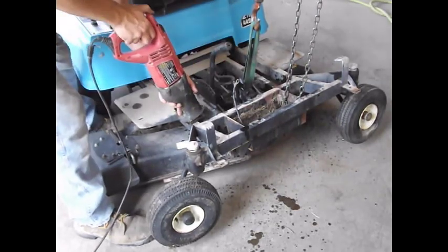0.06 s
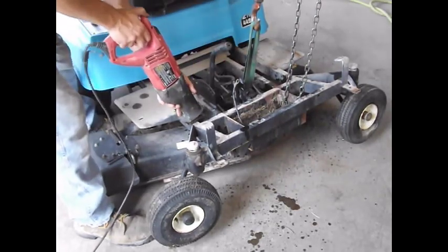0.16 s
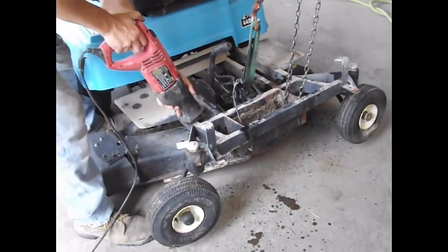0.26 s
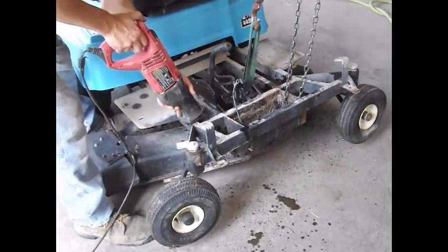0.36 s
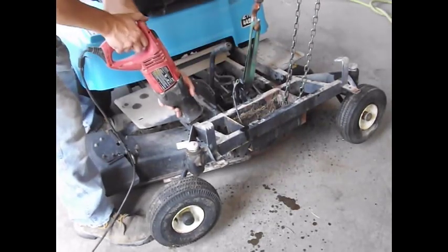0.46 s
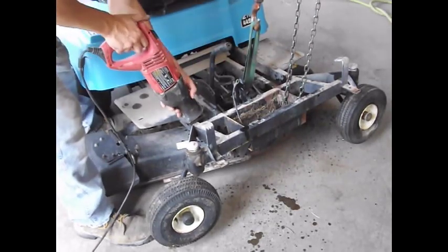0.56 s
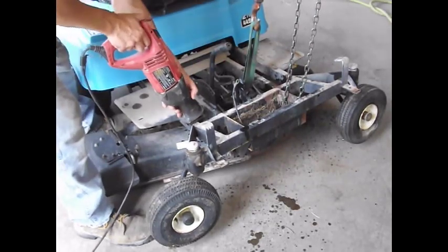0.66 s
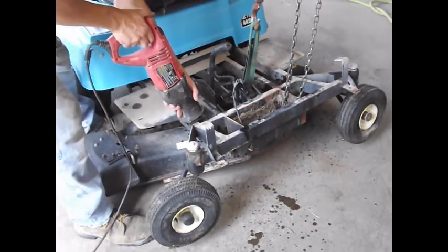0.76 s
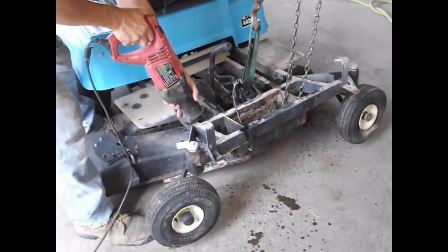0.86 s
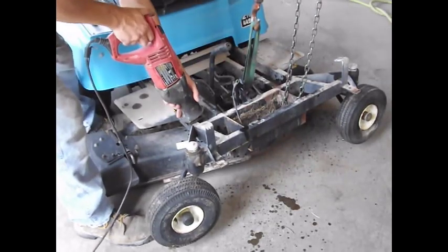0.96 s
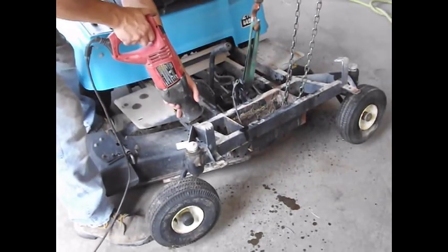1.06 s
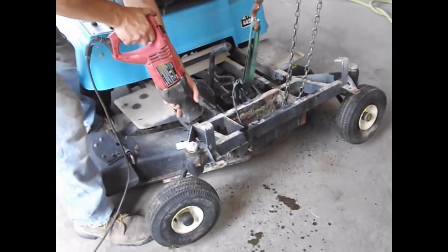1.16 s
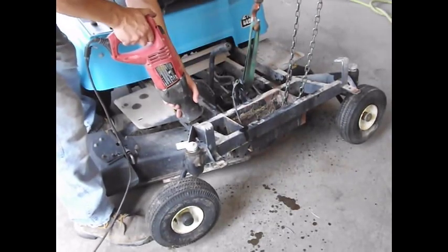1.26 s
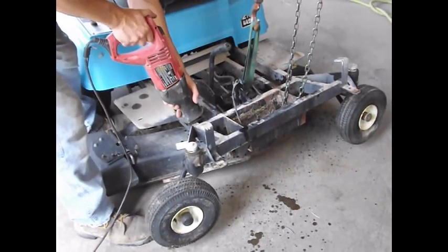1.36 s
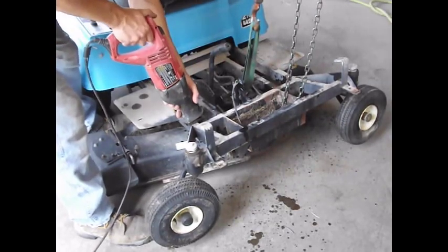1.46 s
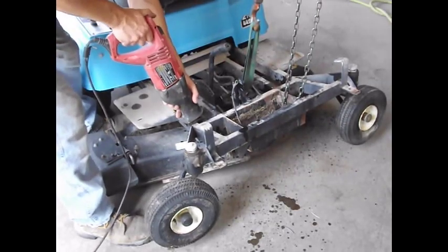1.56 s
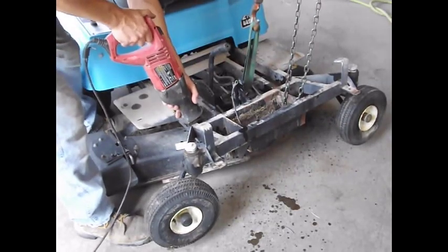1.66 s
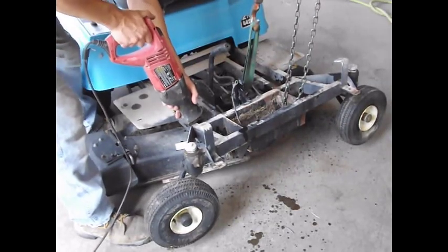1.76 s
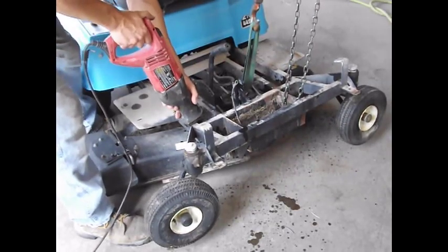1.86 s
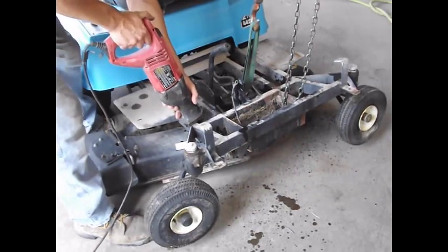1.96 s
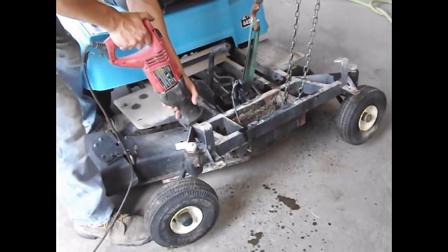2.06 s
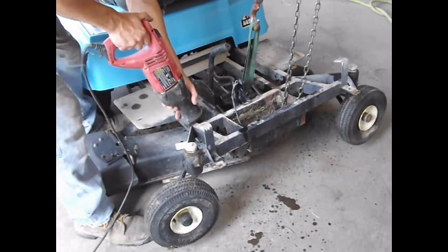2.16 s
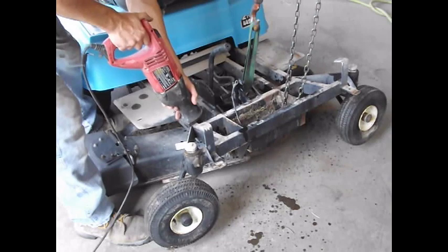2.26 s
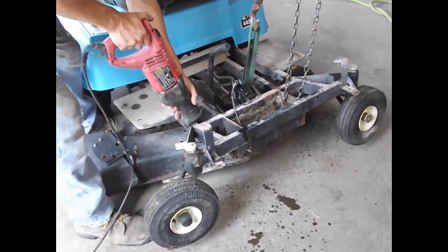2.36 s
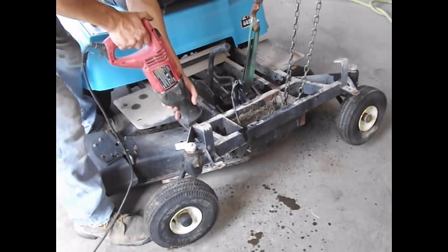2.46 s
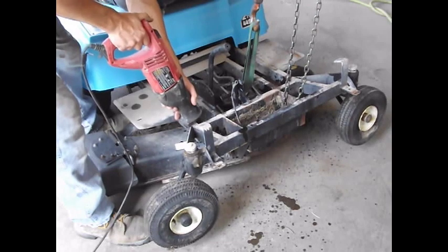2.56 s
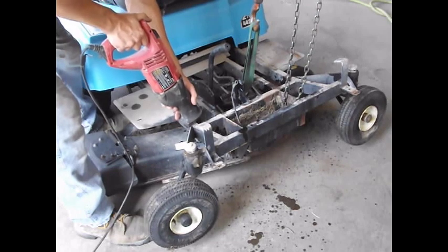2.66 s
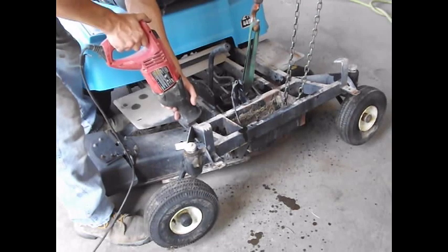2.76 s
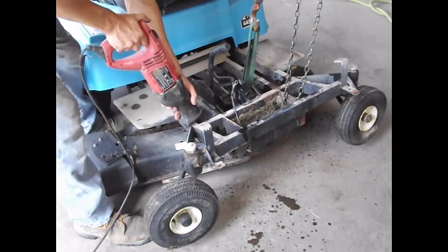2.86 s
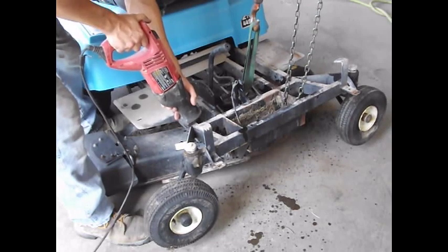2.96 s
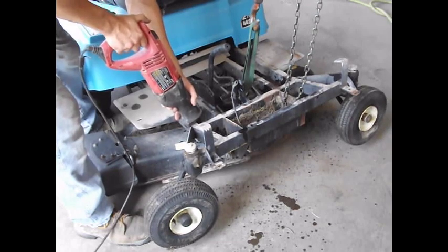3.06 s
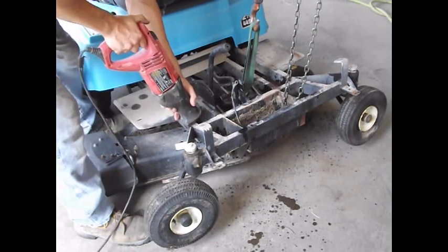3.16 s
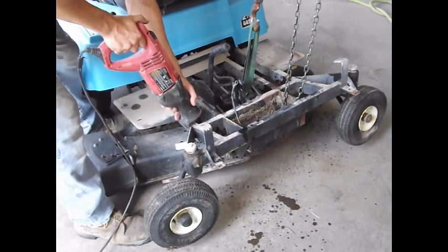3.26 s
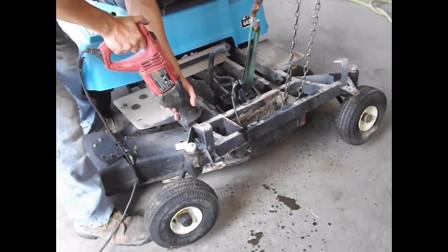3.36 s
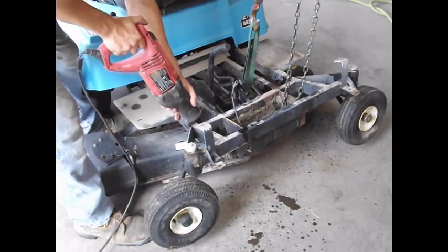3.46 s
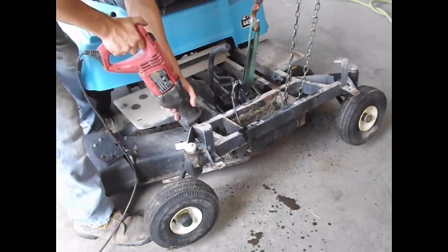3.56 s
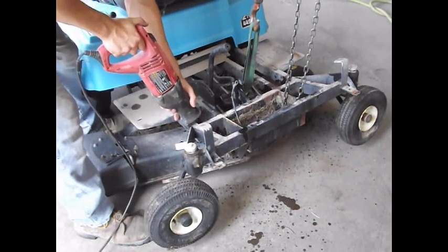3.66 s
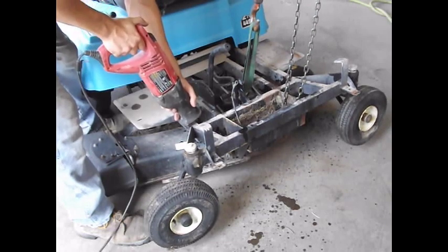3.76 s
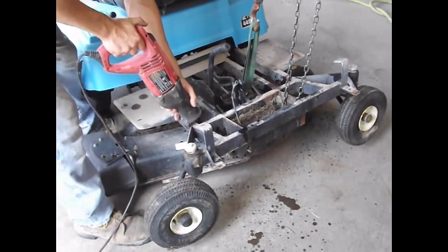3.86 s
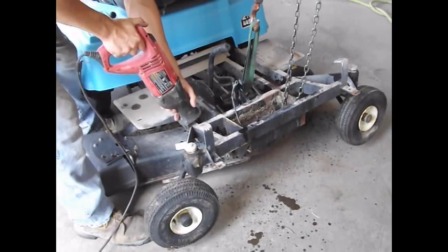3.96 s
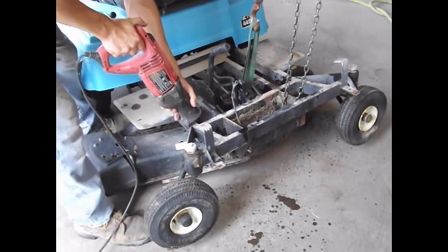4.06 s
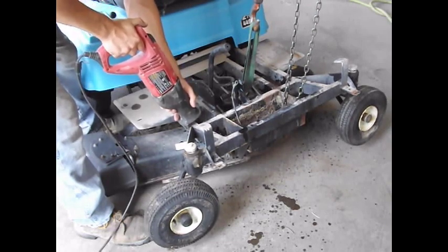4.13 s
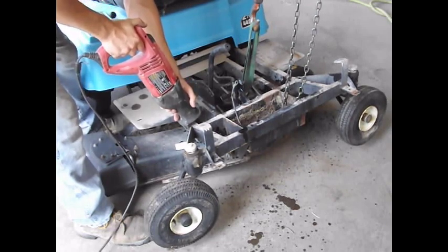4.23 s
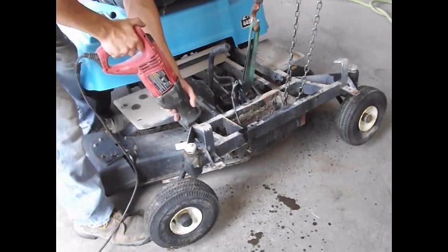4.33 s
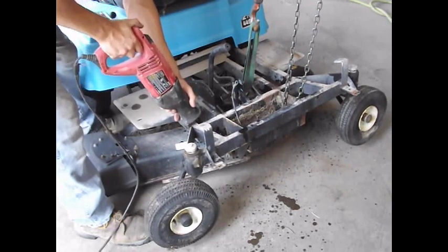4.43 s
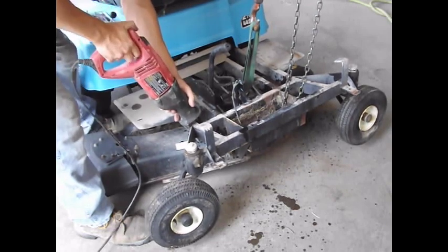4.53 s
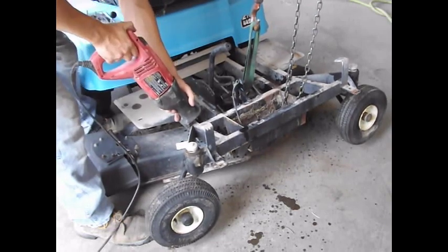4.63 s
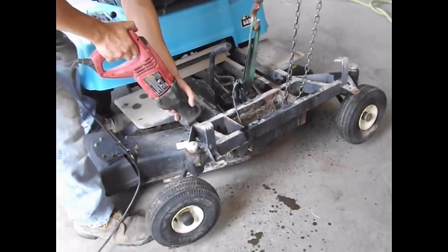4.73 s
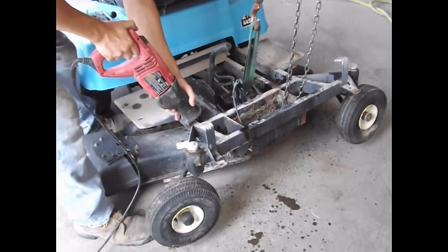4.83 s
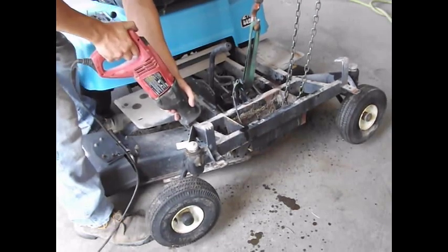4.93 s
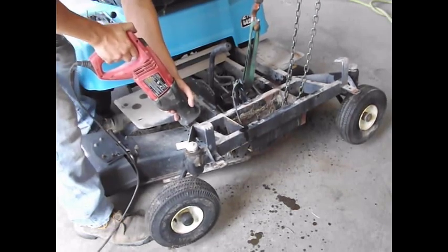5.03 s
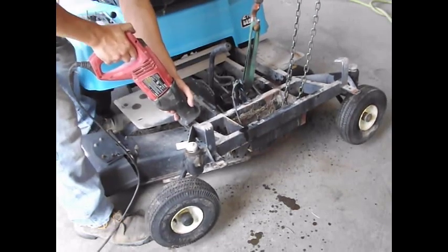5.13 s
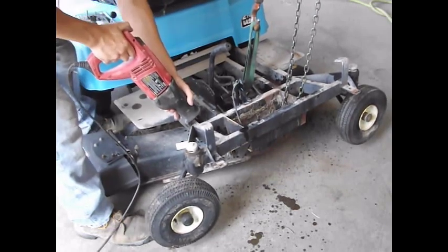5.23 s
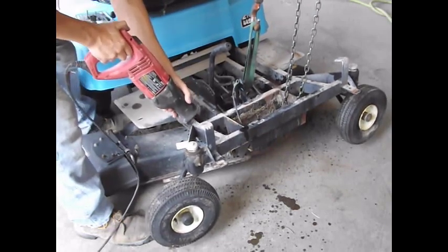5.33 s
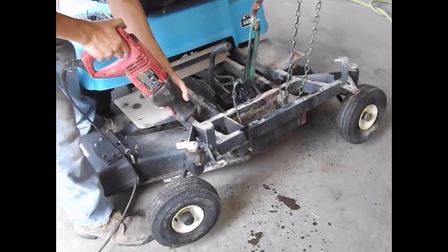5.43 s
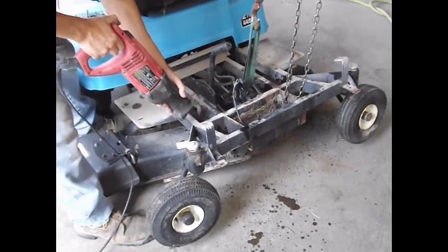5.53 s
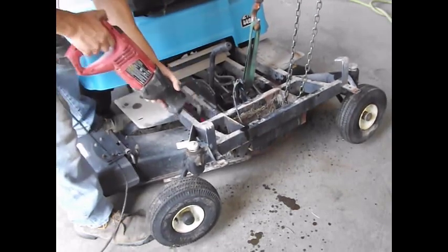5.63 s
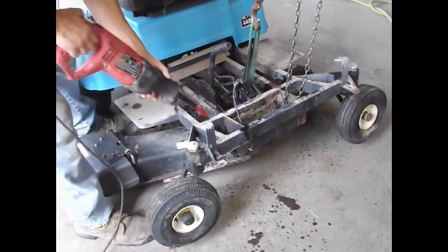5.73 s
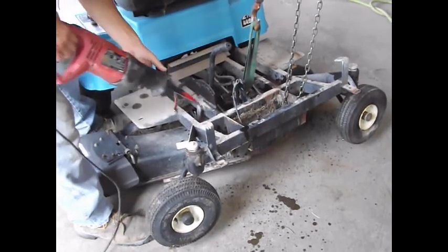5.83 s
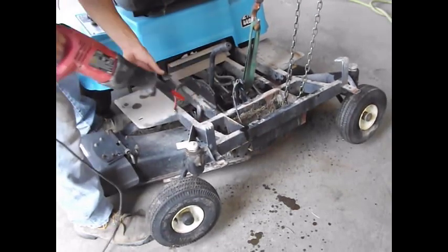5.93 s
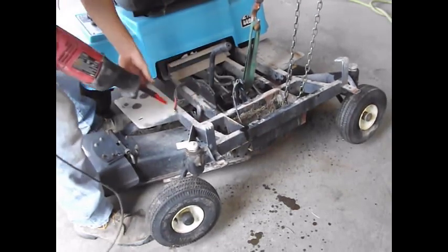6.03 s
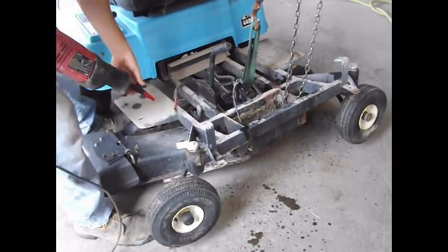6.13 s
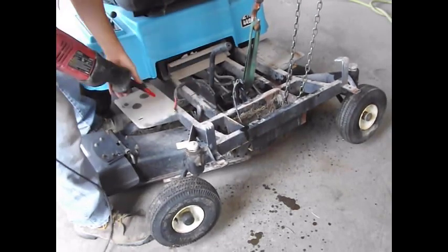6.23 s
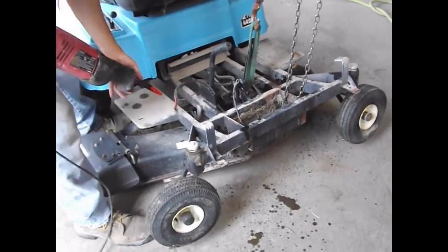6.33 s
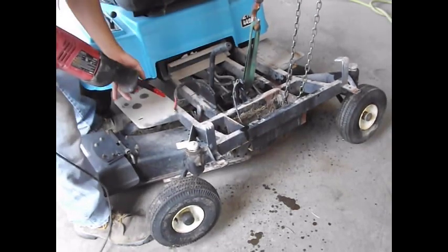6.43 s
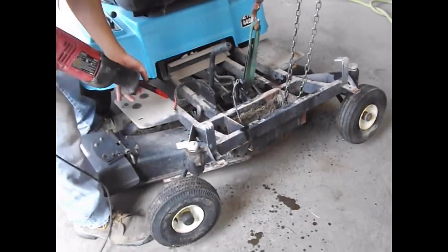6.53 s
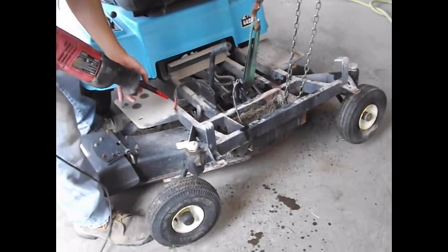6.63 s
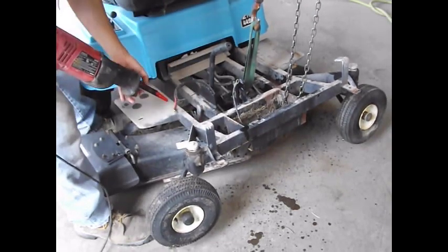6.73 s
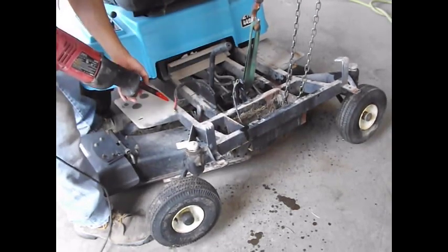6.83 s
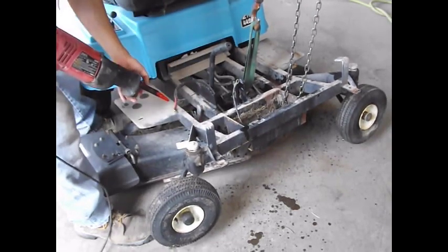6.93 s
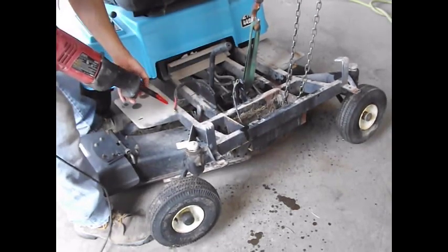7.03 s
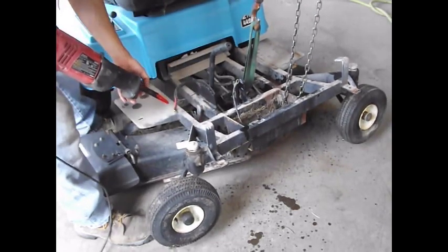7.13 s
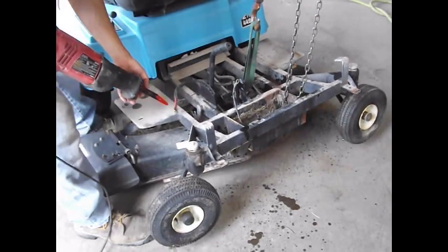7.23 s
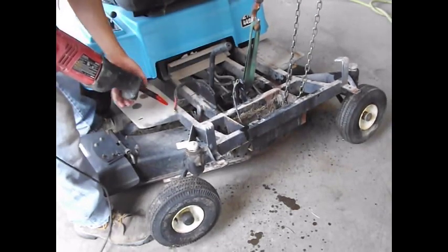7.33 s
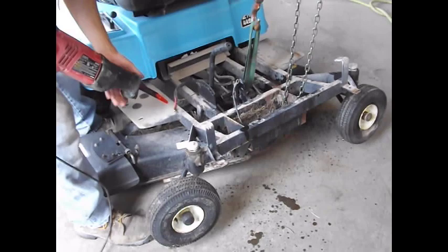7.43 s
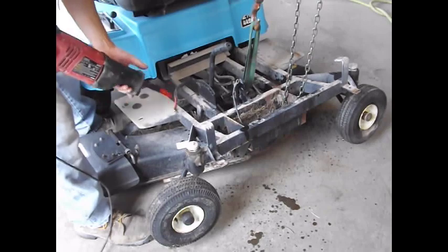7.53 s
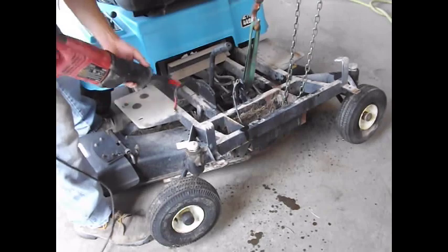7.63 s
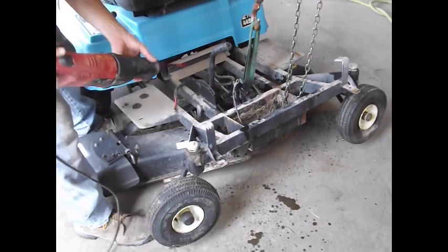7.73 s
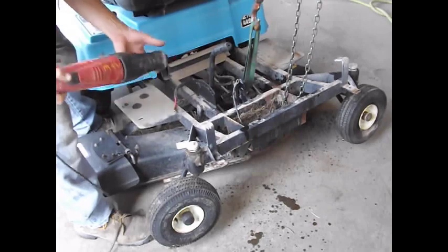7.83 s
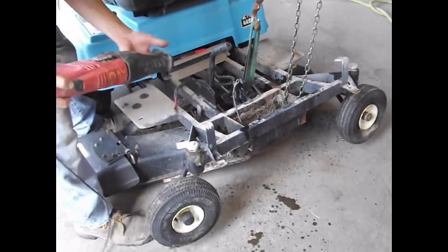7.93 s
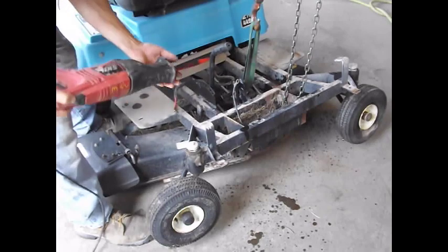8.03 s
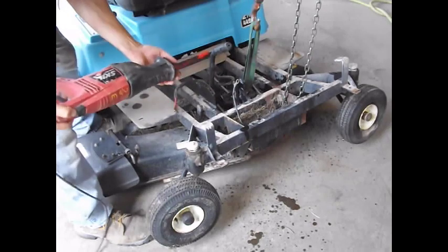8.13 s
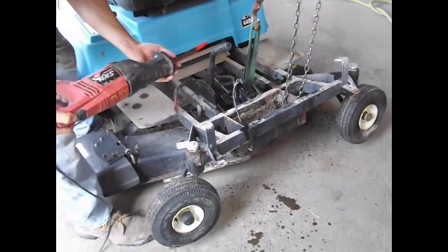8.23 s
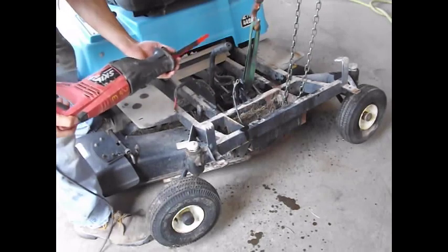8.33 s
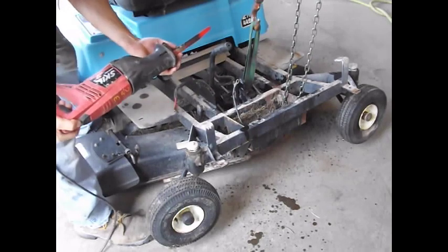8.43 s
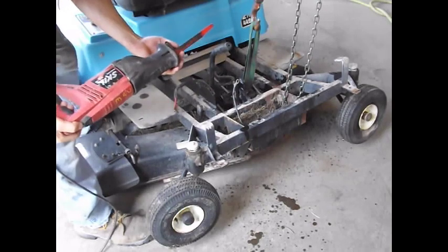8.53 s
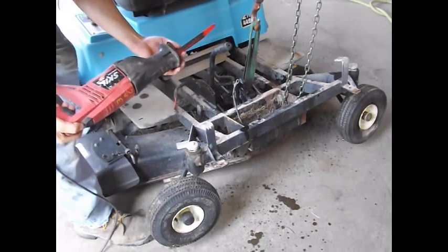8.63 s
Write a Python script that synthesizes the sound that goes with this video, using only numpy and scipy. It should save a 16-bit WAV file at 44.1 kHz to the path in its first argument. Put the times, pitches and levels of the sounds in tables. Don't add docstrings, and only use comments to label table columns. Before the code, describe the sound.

After small knocks and a squeak, a power saw grinds loudly through metal, winds down, and is clattered free in a workshop.

```python
import sys
import numpy as np
from scipy import signal
from scipy.fft import rfft, irfft
from scipy.io import wavfile
from scipy.ndimage import uniform_filter1d

SR = 44100
rng = np.random.default_rng(int(sys.argv[2]) if len(sys.argv) > 2 else 0)


def nominal_scale(level):
    x = np.asarray(level, float) / 20
    return 10 ** x


def dump_mix(stems):
    frames = np.atleast_2d(stems).T
    limited = np.clip(frames, -1, 1)
    pcm = np.round(limited * 32767).astype(np.int16)
    wavfile.write(sys.argv[1], SR, pcm)


N = 383229

# (frequency [Hz], density [dB per Hz])
SHOP_HISS = [(26, -8), (45, -18.5), (76, -13), (279, -12), (358, -16.5), (478, -19), (614, -18.5),
             (989, -22), (1410, -21.5), (2040, -20.5), (3160, -19.5), (4880, -26.5), (6390, -31),
             (8310, -104), (14100, -120)]
# (frequency [Hz], density [dB per Hz])
AIR_RUMBLE = [(1.8, -31.5), (3.0, -5.5), (16, 7), (25, -6.5), (54, -11.5), (83, -20), (120, -23.5),
              (160, -46.5), (260, -120)]
# (time [s], level [dB])
DRAUGHT = [(0, -27), (.85, -30), (1.3, -33), (5.2, -35), (5.8, -29.5), (6.2, -34.5), (7.6, -33.5),
           (8.0, -30.5), (8.69, -30)]
# (time [s], peak [dB], rise [s per 10 dB], fall [s per 10 dB])
DRAGS = [(.3, -42.5, 0.3581, 0.1655), (.6, -46, 0.0617, 0.13), (1.1, -45.5, 0.298, 0.8345),
         (1.283, -30.5, 0.0187, 0.4565), (5.8, -40, 1.1513, 0.3225), (7.1, -46.5, .5, 1.3741),
         (7.6, -44.5, 0.5755, 1), (7.9, -40, 0.4859, 0.0055), (7.99, -27.5, 0.0475, 0.1283),
         (8.11, -40, .02, .25), (8.45, -40.5, 0.0041, 0.2228), (8.69, -45.5, 0.1509, -1.1782)]
# (time [s], pitch [Hz], level [dB])
SQUEAK = [(.5, 2785, -80), (.58, 2976, -44), (.68, 3230, -62), (1.0, 2750, -55), (1.1, 2880, -50),
          (1.17, 3050, -45.5), (1.24, 3150, -49), (1.3, 3250, -46)]
# (time [s], pitch [Hz], level [dB])
TUBE_HUM = [(7.8, 561.9, -69.5), (8.044, 544.2, -50), (8.356, 549.4, -55), (8.69, 541.5, -56)]
# (time [s], peak [dB], thud re peak [dB], part resonance [Hz])
KNOCKS = [(0.1616, -23.5, -5.5, 2800), (0.1721, -21, -34.5, 1261), (0.2157, -24.5, -11, 1214),
          (0.2679, -23, -10.5, 2610), (0.595, -24, -20, 2988), (5.687, -17.5, -32.5, 2851),
          (5.7466, -23, -25, 2738), (5.7954, -24.5, -29.5, 2862), (6.0253, -20.5, -24.5, 3062),
          (6.0479, -17, -27, 2837), (6.13, -23, -15.5, 2930), (6.407, -21, -19, 2348),
          (6.4131, -19, -29, 2920), (6.4226, -16, -31.5, 3017), (6.6142, -16, -34, 2826),
          (6.7725, -22.5, -26.5, 1375), (6.943, -20.5, -49.5, 2792), (7.1214, -22.5, -31, 2903),
          (7.7283, -25.5, -13.5, 2675), (7.8284, -28, -5.5, 2589), (7.8821, -26.5, -2.5, 2076),
          (7.9436, -20, -29.5, 2524), (7.961, -7.5, -27, 2490), (7.9671, -9, -14, 3075),
          (7.9734, -16.5, -5, 2820), (8.03, -21.5, -6, 2690), (8.4149, -12, -30, 3900),
          (8.4317, -23, -37, 1830), (8.4461, -19.5, -32.5, 2960), (8.6704, -24.5, -17, 2890)]
# (frequency [Hz], density [dB per Hz])
CRACK = [(400, -34.5), (800, -8), (1300, 0), (2200, -1.5), (3000, 3), (4300, -8), (5200, -19),
         (7000, -17.5)]
# (time [s], pitch [Hz], peak [dB], decay time T60 [s])
PINGS = [
    (.214, 1297, -40, 0.2232),
    (7.963, 3076, -21.5, 0.1186),
    (8.416, 1879, -25, 0.12),
    (8.434, 1870, -32, 0.17),
    (8.448, 1857, -33, .14),
    (8.448, 2699, -33, 0.138),
]
# (time [s], peak [dB])
THUMPS = [
    (1.334, -9),
    (1.41, -12.5),
    (1.84, -16),
    (3.06, -15.5),
    (4.12, -17.5),
    (4.81, -15.5),
    (5.09, -10.5),
    (5.612, -27),
    (7.972, -20),
    (8.03, -27),
]
# (time [s], peak [dB])
SNAGS = [(1.6116, -8.5), (1.6555, -5), (1.6666, -1), (1.7124, -5), (1.8646, -2.5), (1.9536, -2),
         (2.2117, -1.5), (2.4166, -3.5), (2.6045, -0.5), (2.6248, -2.5), (2.7435, 0), (2.9104, -3),
         (2.9527, -4.5), (3.0864, -0.5), (3.1571, -3), (3.275, -2.5), (3.3686, -2), (3.6217, -4.5),
         (3.709, -2), (3.8382, -0.5), (3.9282, -5), (3.9809, -2), (4.1132, -1.5), (4.1968, -2), (4.4899, 1),
         (4.6377, -4.5), (4.6759, -0.5), (5.0868, -4), (5.1065, -0.5), (5.2109, -9)]
# (time [s], peak [dB], chatter [ms])
JAMS = [(1.333, 2.1, 3.9), (1.348, -1.5, 1.6), (1.362, -5, 2.4), (1.408, 1.1, 8.3), (1.421, 1, .7),
        (1.43, -2, .8), (1.45, 1, 1), (1.469, 1, 1.5), (1.537, 4, 1.5), (1.543, 0, 1.2), (2.013, 3.3, .5),
        (2.665, 2, 1.4), (2.669, 0, 1.2), (2.687, 0, 1.4), (3.2, .9, 1), (3.403, .3, 1.2),
        (3.449, 1.7, 1.6), (3.755, -1.5, 1.2), (4.811, 0, 1.5), (4.988, -.2, 1.6), (5.62, -22.5, 2),
        (5.088, -2, 2), (5.107, -4, 1.5), (5.211, -14, 1)]
# (time [s], rate [Hz])
REVERSALS = [(1.25, 9.943), (1.75, 40.69), (1.95, 44.53), (2.2, 48.24), (2.45, 48.95), (2.95, 49.15),
             (3.2, 48.42), (3.45, 46.78), (3.7, 45.29), (3.95, 44.34), (4.2, 44.83), (4.45, 40.86),
             (5.0, 22.0), (5.3, 12.0), (5.9, 4.0)]
# (time [s], bite [dB], looseness [dB])
PUSH = [(1.27, -52, 5), (1.283, -37, 8), (1.325, -32, 13), (1.345, -21, 15), (1.49, -25, 13),
        (1.8, -17.5, 7.5), (2.1, -15.5, 0), (2.6, -13.5, 0), (3.05, -14, 1), (3.6, -14.5, 0.5),
        (4.35, -13.5, 0.5), (4.45, -20, 4.5), (4.95, -18, 6.5), (5.15, -27, 14.5), (5.45, -28, 12),
        (5.55, -33.5, 8.5), (5.75, -34.5, -3.5), (5.95, -46.5, -3.5)]
# (time [s], swell [dB], half length [ms])
STROKES = [(1.34, 6, 13), (1.41, 8.5, 14), (1.575, -3, 30), (1.96, 5, 30), (2.66, 4.5, 38), (3.09, 3.5, 22),
           (4.13, 2, 20), (4.445, 7, 24), (4.492, 5.5, 12), (4.548, 4.5, 21), (4.67, 6.5, 10),
           (4.745, 3.5, 19), (4.81, 8.5, 8.9), (4.92, 4, 38), (4.985, 5, 16), (5.098, 13, 16.87),
           (5.165, 3.5, 18), (5.255, 6.5, 17.83), (5.33, 6, 21.37), (5.432, 11, 14.866), (5.475, 6, 11),
           (5.55, 4.5, 12), (5.62, 7, 15), (4.59, -2.5, 25), (4.71, -4, 17), (4.86, -5, 20), (5.05, -5, 15),
           (5.2, -5, 10), (5.3, -5, 12.08), (5.39, -3.5, 15)]
# (frequency [Hz], density [dB per Hz])
RASP = [(150, -49), (250, -18), (407, -12), (760, -12.5), (1100, -7.5), (1330, -9), (1790, -8.5),
        (2100, -5.5), (2870, -3), (3470, -11.5), (4680, -18), (5500, -24.5), (6390, -27), (8310, -74),
        (14100, -120)]
# (frequency [Hz], width [Hz], level [dB])
SHOE = [(2930, 356.33, 4), (2410.6, 475.6, 2), (2162.6, 240, -7.5), (3322.5, 770, -9.5),
        (1642.5, 952.8, -9)]
# (frequency [Hz], width [Hz], level [dB])
PLATES = [(1095, 16, -9), (1242, 16, -11), (1888, 16, -8), (2388, 20, -6), (2440, 30, -5), (2558, 25, -3),
          (2612, 25, -4), (2836, 30, 0), (2910, 25, -3), (2985, 30, -1), (3296, 22, -10)]
# (frequency [Hz], width [Hz], level [dB])
FRAME = [(299.08, 120, -8.5), (400.29, 40, -0.5), (446.04, 25, -2.5), (523.8, 56, -6), (718.7, 35, -17.5)]
# (frequency [Hz], width [Hz], level [dB])
RAIL = [(135.05, 3.2, -10), (156.58, 14, -16.5), (205.94, 13, 1.5)]
# (frequency [Hz], gain [dB])
PORT_NOTCH = [(4800, 0), (5250, -4.5), (5550, -14.5), (5850, -7), (6400, -11.5)]

DUCK_S, DUCK_FADE_S, DUCK_DB = 1.33, .1, -25.5
RECOVER_S, RECOVER_FADE_S = 4.781, 0.2898
SNAG_MS = .8
BLADE_SWING = .8
FIRST_BITE_S, FIRST_BITE_DB, FIRST_BITE_FADE_S = 1.31, 9, .2


def unit(x):
    return x / np.sqrt(np.mean(x ** 2))


def track(rows, off=None):
    s, *columns = np.transpose(rows)
    return [np.interp(np.arange(N) / SR, s, c, off, off) for c in columns]


def colour(x, points, size=16384):
    hz, db = np.transpose(points)
    f = np.maximum(np.arange(size // 2 + 1) * SR / size, 1)
    cepstrum = irfft(np.log(nominal_scale(np.interp(np.log(f), np.log(hz), db))))
    cepstrum[1:size // 2] *= 2
    cepstrum[size // 2 + 1:] = 0
    response = irfft(np.exp(rfft(cepstrum)))
    return signal.fftconvolve(x, response)[:len(x)]


def ring(x, modes):
    out = 0
    for k, (hz, width, db) in enumerate(modes):
        r = np.exp(-np.pi * width / SR)
        poles = [1, -2 * r * np.cos(2 * np.pi * hz / SR), r * r]
        gain = (-1) ** k * nominal_scale(db) * np.sqrt(1 - r)
        out = out + gain * signal.lfilter([1, 0, -1], poles, x)
    return out


def walk(rate):
    k = int(SR / rate)
    held = np.repeat(rng.standard_normal(N // k + 1), k)
    return 1.3851 * uniform_filter1d(uniform_filter1d(held, k), k)[:N]


def grit(per_s, spread_db):
    where, size, sign = rng.random((3, N))
    heights = nominal_scale(-spread_db * np.log(1 - size)) * np.sign(sign - .5)
    return unit((where < per_s / SR) * heights)


def tone(rows, wobble, flutter_db, rate):
    hz, db = track(rows, off=-120)
    level = np.sqrt(2) * nominal_scale(db + flutter_db * walk(rate))
    cycles = np.cumsum(hz * (1 + wobble * walk(rate))) / SR
    return level * np.sin(2 * np.pi * cycles)


def add(out, s, sound):
    i = int(s * SR)
    out[i:i + len(sound)] += sound[:N - i]


def blow(push, db, body):
    y = body(push)
    return nominal_scale(db) * y / np.abs(y).max()


def shop():
    hiss = nominal_scale(-41 + 0.36 * walk(7.5)) * unit(colour(rng.standard_normal(N), SHOP_HISS))
    duck_db, = track([(DUCK_S, 0), (DUCK_S + DUCK_FADE_S, DUCK_DB),
                      (RECOVER_S, DUCK_DB), (RECOVER_S + RECOVER_FADE_S, 0)])
    draught_db, = track(DRAUGHT)
    gusts_db = 1.5 * walk(5)
    rumble = unit(colour(rng.standard_normal(N), AIR_RUMBLE, size=65536))
    return hiss + nominal_scale(draught_db + duck_db + gusts_db) * rumble


def room(x, t60_s, wet_db):
    t = np.arange(SR // 2) / SR
    tail = rng.standard_normal(len(t)) * np.exp(-np.log(1000) * t / t60_s) * (t > .004)
    return x + nominal_scale(wet_db) * signal.fftconvolve(x, tail / np.sqrt(np.sum(tail ** 2)))[:N]


def scrape():
    t = np.arange(N) / SR
    power = 0
    for s, db, rise, fall in DRAGS:
        power = power + nominal_scale(db - 10 * np.maximum((s - t) / rise, (t - s) / fall)) ** 2
    grains = nominal_scale(2 * walk(70)) * rng.standard_normal(N)
    squeak = tone(SQUEAK, wobble=.035, flutter_db=4, rate=400)
    hum = tone(TUBE_HUM, wobble=0.0027, flutter_db=-1.0, rate=90)
    return np.sqrt(power) * unit(colour(grains, CRACK)) + squeak + hum


def knocks():
    out, t = np.zeros(N), np.arange(8192) / SR
    thud = [(408.55, 72.4, -0.5), (630.35, 116.8, 0), (870.5, 325.5, 1)]  # Hz, width Hz, dB
    noises = rng.standard_normal((len(KNOCKS), 8192))
    for (s, db, thud_db, hz), noise in zip(KNOCKS, noises):
        burst = noise * (np.exp(-t / 0.001272) + 0.4044 * np.exp(-t / 0.020798))
        add(out, s, blow(burst, db, lambda x: colour(x, CRACK, size=1024)))
        add(out, s, blow(burst, db - 12.5, lambda x: ring(x, [(hz, 200, 0)])))
        add(out, s, blow(burst, db + thud_db + 3, lambda x: ring(x, thud)))
    for s, hz, db, t60 in PINGS:
        add(out, s, nominal_scale(db) * np.sin(2 * np.pi * hz * t) * np.exp(-np.log(1000) * t / t60))
    return out


def thumps():
    out, t = np.zeros(N), np.arange(8192) / SR

    def rattling_frame(x):
        return unit(ring(x, FRAME)) + nominal_scale(-1.5) * unit(colour(x, RASP, size=1024))

    for (s, db), noise in zip(THUMPS, rng.standard_normal((len(THUMPS), 8192))):
        burst = noise * np.exp(-t * 1000 / 12)
        add(out, s, blow(burst, db, rattling_frame))
    return out


def snags(rows, top_db):
    out, t = np.zeros(N), np.arange(4096) / SR

    def blade_and_shoe(x):
        return unit(ring(x, SHOE)) + 0.067 * unit(colour(x, RASP, size=1024))

    for (s, db, ms), noise in zip(rows, rng.standard_normal((len(rows), 4096))):
        burst = uniform_filter1d(noise, size=6) * np.exp(-t * 1000 / max(ms, .2))
        add(out, s, blow(burst, min(db - 1.5, top_db), blade_and_shoe))
        add(out, s, blow(burst, db - 30.5, lambda x: ring(x, FRAME)))
    return out


def catches():
    rate, = track(REVERSALS)
    bite_db, _ = track(PUSH, off=-120)
    turns = np.cumsum(rate) / SR
    at = np.flatnonzero(np.diff(np.floor(turns + .1)) > 0)
    at = at[rate[at] > 30]
    late, size = rng.standard_normal((len(at), 2)).T
    times = at / SR + late * 0.0025
    levels = bite_db[at] + 6 + 4 * size
    return [(s, db, SNAG_MS) for s, db in zip(times, levels)]


def saw():
    rate, = track(REVERSALS)
    bite_db, loose_db = track(PUSH, off=-120)
    turns = np.cumsum(rate) / SR
    ms = np.arange(N) * 1000 / SR
    stroke_db = sum(db * np.exp(-((ms - s * 1000) / half) ** 2) for s, db, half in STROKES)
    since_bite = ms / 1000 - FIRST_BITE_S
    jump_db = FIRST_BITE_DB * (since_bite > 0) * np.exp(-np.abs(since_bite) / FIRST_BITE_FADE_S)

    tick_db = bite_db + stroke_db - 4
    rasp_db = bite_db - 7 + 0.8363 * loose_db + 0.56 * stroke_db
    shake_db = bite_db - 22.5 + 0.871 * loose_db + jump_db + 0.71 * stroke_db + 2.5 * walk(10)
    rail_db = bite_db - 23 + 0.9516 * loose_db + .6 * jump_db + 3 * walk(9)

    pace = np.minimum(rate / 44, 1) ** 2
    swell_db = pace * (3.3 * np.cos(2 * np.pi * (turns + .05)) + 2 * np.cos(np.pi * (turns - .4)))
    teeth = nominal_scale(swell_db / 2 + 1.5187 * walk(90)) * rng.standard_normal(N)
    ticks = nominal_scale(swell_db + 0.77 * walk(60)) * grit(per_s=600, spread_db=2.5)

    gear_turns = np.cumsum(rate * (1 + .002 * walk(30))) / SR
    whine = np.sin(2 * np.pi * 46 * gear_turns) * nominal_scale(3 * walk(20))
    plates = unit(ring(teeth + ticks, PLATES))
    blade = unit(ring(ticks, SHOE)) + nominal_scale(-6) * plates + nominal_scale(-14) * pace * whine
    rasp = unit(colour(teeth + 0.12 * ticks, RASP))

    jolt = nominal_scale(1.4 * np.cos(np.pi * (turns - .5))) * rng.standard_normal(N)
    body = nominal_scale(shake_db) * unit(ring(jolt, FRAME)) + nominal_scale(rail_db) * unit(ring(jolt, RAIL))
    return nominal_scale(tick_db) * blade + nominal_scale(rasp_db) * rasp + body


def scene():
    catching = snags([(s, db, SNAG_MS) for s, db in SNAGS] + catches(), top_db=-3)
    cutting = BLADE_SWING * np.tanh((saw() + catching) / BLADE_SWING)
    hits = snags(JAMS, top_db=5) + knocks() + thumps()
    return (room(cutting + hits, t60_s=.25, wet_db=-13) + scrape() + shop())[None]


def band_limit(x):
    return signal.sosfilt(signal.butter(12, 15830, fs=SR, output="sos"), x)


def record(dry):
    anti_alias = signal.cheby2(10, 60, 8300, fs=SR, output="sos")
    x = signal.sosfilt(anti_alias, colour(dry[0], PORT_NOTCH))[None]
    carrier = np.cos(2 * np.pi * 14500 * np.arange(N) / SR)
    x = x + nominal_scale(-59.0) * (x - uniform_filter1d(x, size=800)) * carrier
    x = np.clip(x - .0039, -1, 1)
    return band_limit(x)


dry = scene()
out = record(dry)
dump_mix(out)
```